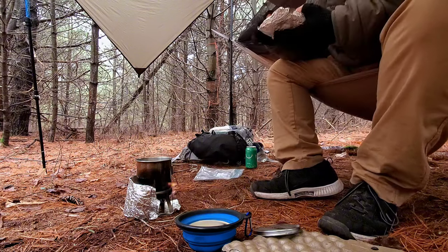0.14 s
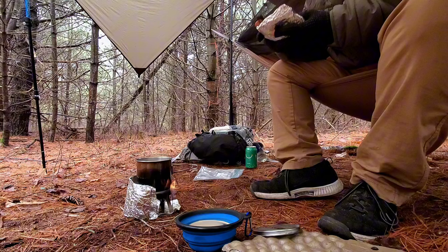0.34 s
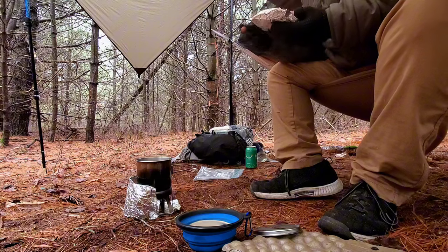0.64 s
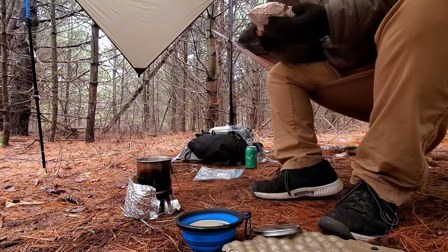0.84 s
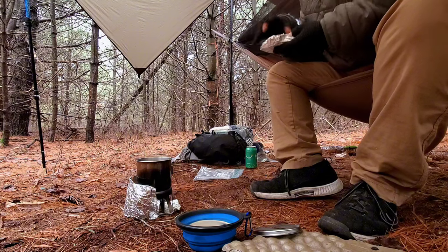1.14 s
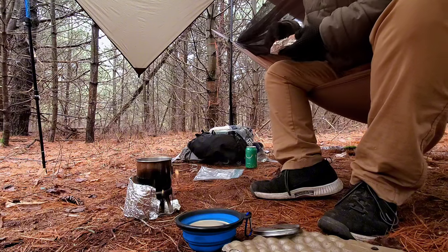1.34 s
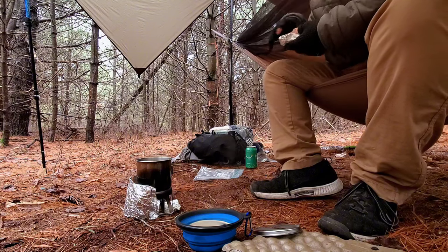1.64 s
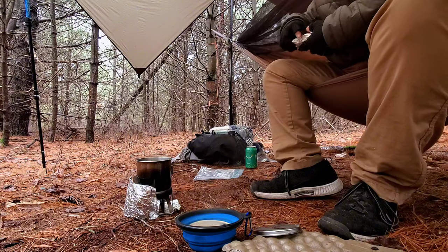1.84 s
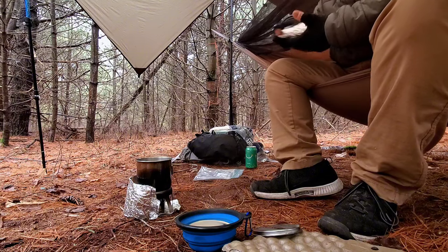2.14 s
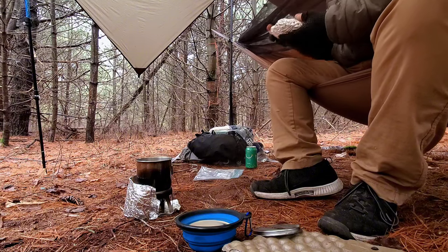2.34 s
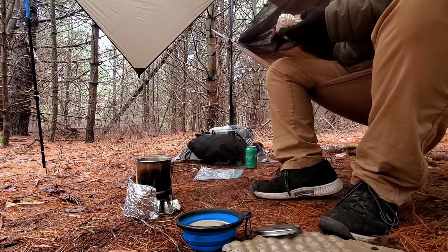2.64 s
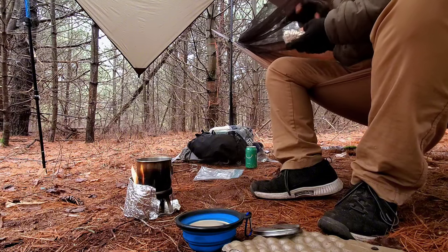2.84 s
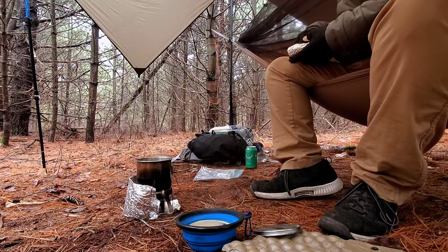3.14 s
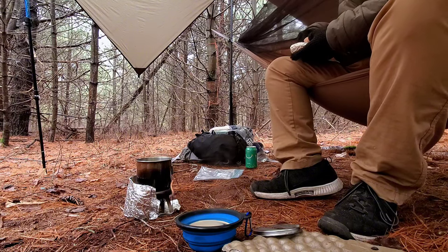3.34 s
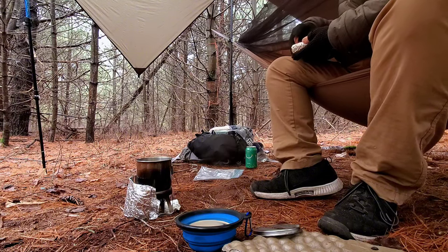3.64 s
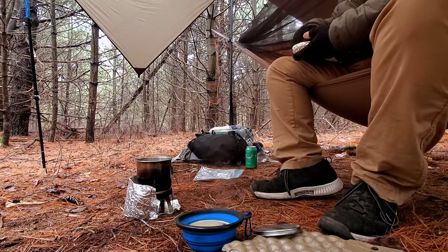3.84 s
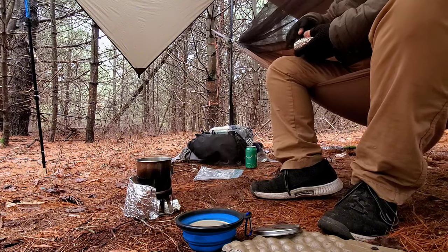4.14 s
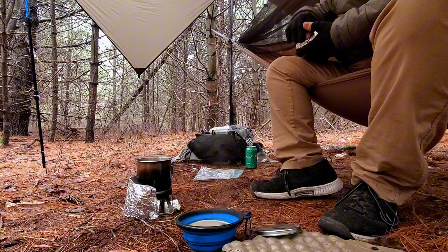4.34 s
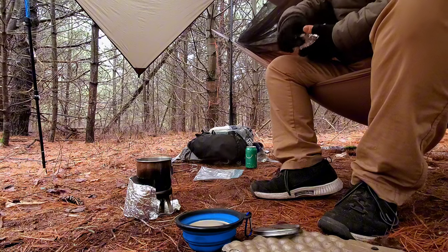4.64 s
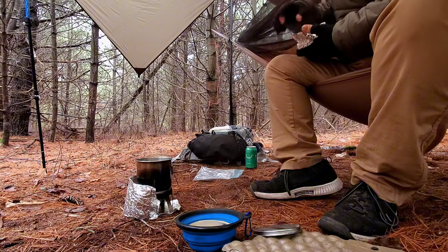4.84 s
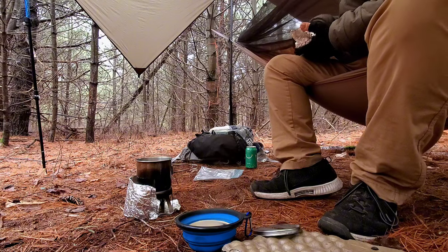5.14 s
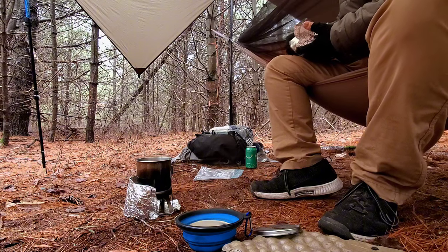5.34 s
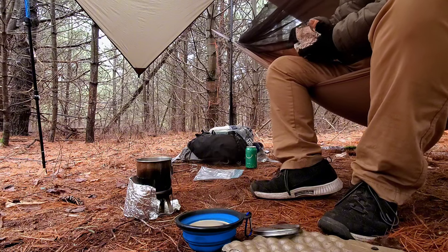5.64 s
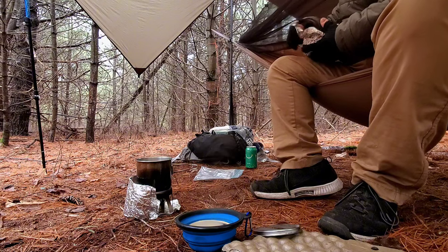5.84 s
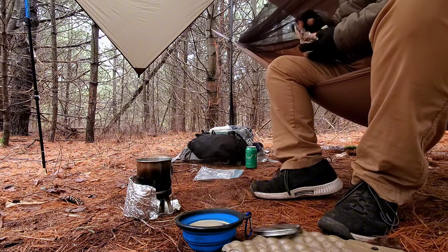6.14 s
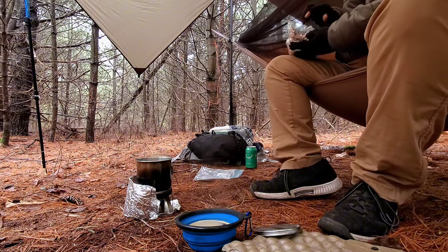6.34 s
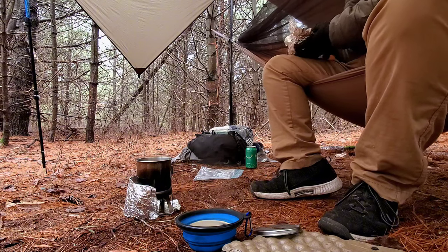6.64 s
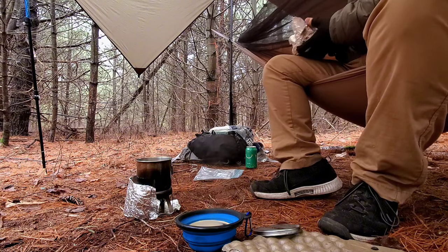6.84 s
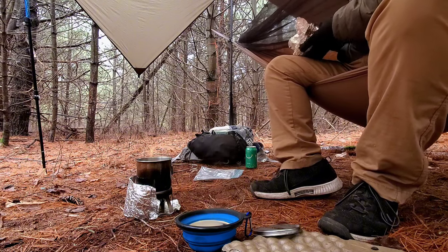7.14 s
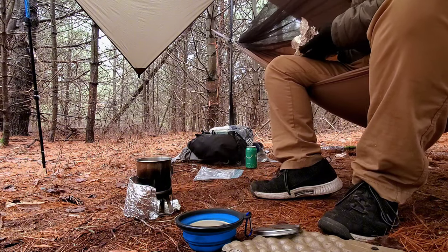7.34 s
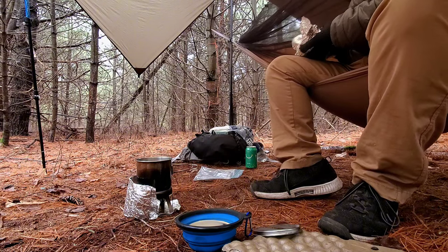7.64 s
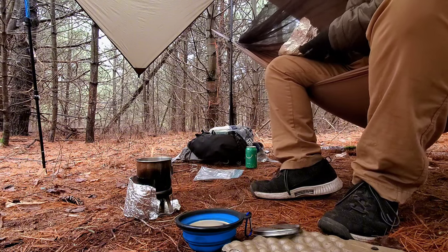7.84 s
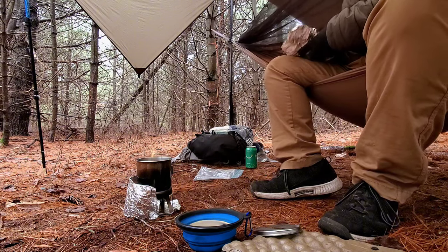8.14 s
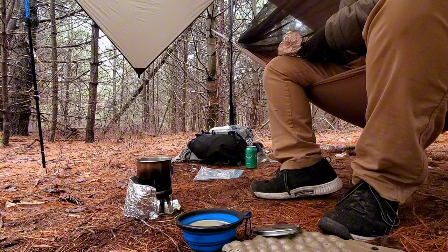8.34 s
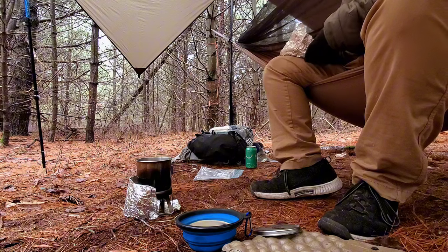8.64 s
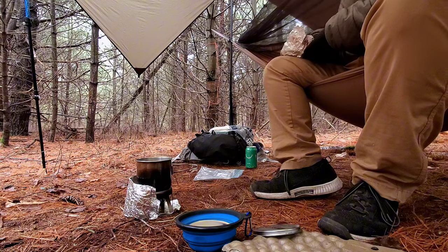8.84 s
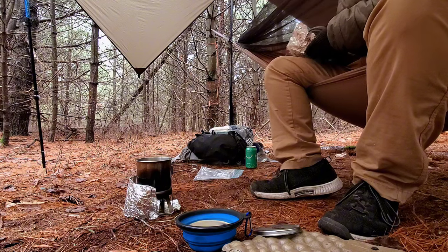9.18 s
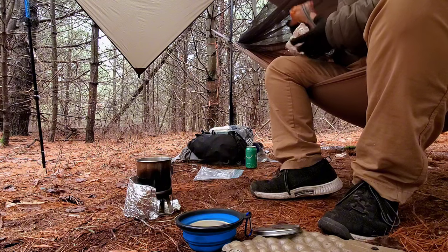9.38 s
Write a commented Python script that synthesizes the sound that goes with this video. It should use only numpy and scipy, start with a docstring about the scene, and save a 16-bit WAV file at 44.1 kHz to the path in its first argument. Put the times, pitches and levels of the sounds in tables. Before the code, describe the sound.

A plastic and foil food wrapper is turned and unwrapped by hand close to the microphone, slightly to the right, outdoors in a wood. Each movement makes a burst of fine, crisp rustling, dotted with sharp snaps as larger creases flip over. The crinkling comes in uneven spurts from the start to about 2.8 seconds, turns lighter until about 4.3, then picks up again. It is busiest from about 5 to 7.5 seconds, with louder crackles and several short, dull thuds as the packet is gripped. More bursts follow between 8 and 9 seconds, and a last crinkle and thud come at about 9.3. Underneath, a distant road gives a soft, steady low rumble, slightly from the left. From about 8.3 to 9.1 seconds a far engine adds a deep drone that wavers in level and climbs in pitch.

```python
"""A plastic and foil food wrapper is turned and unwrapped by hand, right of a small camera's two mic ports.
Each move of the hands sets off a rustle of tiny creases; bigger creases snap over and ring the sheet,
and the packet thuds dully as it is gripped. Behind it, beyond a tarp in a pine wood, a far road
rumbles from the left, and one engine drones up near the end."""
import sys
import numpy as np
from scipy import signal
from scipy.fft import rfft, irfft, next_fast_len
from scipy.io import wavfile
from scipy.ndimage import uniform_filter1d

SR = 44100
rng = np.random.default_rng(int(sys.argv[2]) if len(sys.argv) > 2 else 0)


def dump(signal):
    """Clip the signal to [-1, 1] and save it as 16-bit WAV at the path in sys.argv[1]."""
    limited = np.clip(np.atleast_2d(signal).T, -1, 1)
    pcm = np.round(limited * 32767).astype(np.int16)
    wavfile.write(sys.argv[1], SR, pcm)


N = 419391


def gain_of(db):
    """Decibels to amplitude."""
    return 10 ** (np.asarray(db) / 20)


def unit_rms(x):
    """Normalises to rms 1."""
    return x / np.sqrt(np.mean(x ** 2) + 1e-20)


def curve_at(points, hz):
    """Reads a breakpoint curve on a log-frequency axis."""
    f, value = np.transpose(points)
    return np.interp(np.log(hz + 1), np.log(f + 1), value)


def add(mix, start_s, sound):
    """Drops a sound into the mix at its cue."""
    part = mix[round(start_s * SR):][:len(sound)]
    part += sound[:len(part)]


def ticks(size, spiky_db):
    """Gritty noise on three buses: shared by both ports, left only, right only."""
    return unit_rms(rng.standard_normal((3, size)) * gain_of(spiky_db * rng.standard_normal(size)))


def mottle(shape, bins, frames):
    """Random texture of rms 1, smoothed over frequency bins and time frames."""
    across_pitch = uniform_filter1d(rng.standard_normal(shape[::-1]).T, bins, axis=0)
    return unit_rms(uniform_filter1d(across_pitch, frames, axis=-1))


# Tone of the road and air: f/Hz, relative level/dB
ROAD_EQ = [(20, -51), (35, -61), (50, 3), (70, 4), (100, -9), (160, -17.5), (280, -24.5), (450, -24),
           (700, -21), (1300, -28), (1800, -38.5), (2500, -48), (5000, -44), (7400, -48), (16000, -42)]
# Stereo image of the bed: f/Hz, left-right correlation
ROAD_COHERENCE = [(60, 1), (130, 0.86), (300, 0.82), (1000, 1), (1600, 0.47), (4000, 0.12)]
# Fader ride of the bed: t/s, level/dB
ROAD_FADER = [(0, -46), (3, -47), (4.5, -44.5), (6, -46), (9.51, -45)]


def far_road(mottle_db=-0.5, right_lag_ms=0.18):
    """A bed of far traffic and air among the trunks, reaching the left port first."""
    frames, hz = N // 512 + 5, np.fft.rfftfreq(2048, 1 / SR)
    noise = rng.standard_normal((frames, 1025, 4)).T
    left, diffuse = noise[0::2] + 1j * noise[1::2]
    coherence = np.clip(curve_at(ROAD_COHERENCE, hz), -1, 1)[:, None]
    delay = np.exp(-2j * np.pi * hz * right_lag_ms / 1000)[:, None]
    right = delay * coherence * left + np.sqrt(1 - coherence ** 2) * diffuse
    eq_db = curve_at(ROAD_EQ, hz)[:, None] + mottle_db * mottle(left.shape, bins=12, frames=8)
    bed = signal.istft(np.array([left, right]) * gain_of(eq_db), nperseg=2048, noverlap=1536)[1][:, :N]
    fader_db = np.interp(np.arange(N) / SR, *np.transpose(ROAD_FADER))
    return gain_of(fader_db) * unit_rms(bed)


# Bands of the big, middle, small and fine creases: centre f/Hz, width/Hz
CREASE_BANDS = np.array([(400, 500), (1700, 1400), (4600, 4000), (13000, 6000)])
# The wrapper's own tone: f/Hz, gain/dB
SHEET_EQ = [(70, 5), (160, 0.5), (700, -5.5), (1500, -1.5), (2400, -4), (2900, 0.5), (3600, -0.7),
            (5000, -2.43), (6600, -3), (7400, -9), (8300, -7.5), (10000, -4), (15500, 2.5)]


def sheet_colour(levels_db, hz):
    """Blends the levels of the four crease sizes into one EQ curve for the sheet, in dB."""
    crossfades = np.array([curve_at(np.c_[CREASE_BANDS[:, 0], solo], hz) for solo in np.eye(4)])
    density_db = np.transpose(levels_db) - 10 * np.log10(2 * CREASE_BANDS[:, 1] / SR)
    return (density_db @ crossfades + curve_at(SHEET_EQ, hz)).T


# Hand moves: peak t/s, build-up/s, let-go/s, level/dB, big-fold trim/dB, size tilt/dB (+ coarse, - fine)
HAND_MOVES = [(.02, .015, 0.074, -51.5, -15, -5), (.24, 0.099, 0.052, -42, -18, 0.5),
              (.66, 0.28, 0.019, -42.5, -15, 0), (.9, .17, .06, -45, -23, 2), (1.032, .06, .03, -45, -8, 0),
              (1.1, 0.019, 0.072, -61, -9, -1.5), (1.27, 0.032, 0.055, -57, -3, -3),
              (1.561, 0.24, 0.039, -46.5, -9, 0.5), (1.64, .02, .08, -62, -8, 0),
              (1.77, 0.043, 0.1, -51, -16, -2), (1.88, 0.059, 0.12, -56.5, -1, 3),
              (1.94, .03, 0.04, -60, -8, -8), (2.06, 0.024, 0.24, -56.5, -12, -3),
              (2.25, 0.071, 0.05, -42.5, -8, 0.5), (2.38, 0.066, 0.044, -44.5, -13, 1),
              (2.62, 0.18, 0.05, -42.5, -16, 1), (2.779, 0.043, 0.0081, -47.5, -6, 1),
              (2.82, .02, 0.083, -70, -8, 5), (3.018, 0.036, 0.18, -54.5, -1.5, -0.5),
              (3.2, 0.031, 0.033, -64, -8, -7), (3.39, .07, 0.069, -52.5, -5, 0),
              (3.63, 0.11, 0.045, -51.5, -7, 0), (3.7, .02, 0.045, -72, -11, 0),
              (3.87, 0.0067, 0.026, -57.5, -6, -4), (3.971, 0.035, 0.052, -48, -14, 0.5),
              (4.16, 0.17, 0.29, -54, -4.5, -1), (4.368, 0.09, 0.035, -44.5, -5.5, 2.5),
              (4.58, 0.12, 0.024, -45, -8, 1.5), (4.69, 0.081, 0.023, -44, -15, 0.5),
              (4.76, 0.055, 0.09, -48.5, -10, 0.5), (4.9, 0.09, 0.067, -52, -7, -1.5),
              (5.0, .03, .02, -60.5, -10, -1), (5.06, .015, 0.017, -55, -17, 3),
              (5.14, 0.036, 0.22, -48.5, -6, 1), (5.22, .03, 0.1, -74, 1, -1),
              (5.391, 0.054, 0.037, -40.5, -3.5, 2.5), (5.53, 0.044, .03, -49, 1, 2),
              (5.72, .04, 0.036, -53, 0, 1), (5.88, 0.094, 0.13, -46, -9.5, -0.5),
              (6.11, 0.091, 0.012, -40, -8.5, -0.5), (6.362, 0.23, 0.038, -45.5, -9, 0),
              (6.48, 0.082, 0.063, -53.5, -6.5, -2), (6.65, 0.11, 0.072, -52, -22, 0),
              (6.952, 0.35, 0.053, -40.5, -10.5, 0.5), (7.07, .03, 0.035, -62, -3, 0),
              (7.15, 0.046, 0.079, -54, -10, -0.5), (7.28, 0.043, 0.082, -47.5, -7.5, -0.5),
              (7.439, .12, 0.025, -45.5, 2.5, 1.5), (7.5, .02, .05, -64, -8, 0),
              (7.61, 0.027, .09, -65, -3, -5), (7.74, 0.015, 0.19, -54, 2, -0.5),
              (7.81, 0.027, 0.057, -47.5, -3.5, 2), (7.92, 0.069, 0.24, -50, -7, -1),
              (8.12, 0.023, .05, -54.5, 0, 2.5), (8.22, 0.031, 0.11, -46.5, -4.5, -1),
              (8.33, 0.023, 0.24, -41.5, -10, 0.5), (8.608, 0.17, 0.19, -47, -4, 0),
              (8.77, 0.019, 0.063, -60.5, 7.5, -2), (9.002, 0.17, 0.081, -50, -4.5, 0),
              (9.13, 0.035, 0.092, -58, 3, -2), (9.28, 0.051, .04, -43, 2, 2),
              (9.428, 0.018, 0.02, -54, -3, 1)]


def hand_moves(t, swell_db=6.5, attack_db_per_s=443, release_db_per_s=178, middle_db=-7, fine_db=-3):
    """Envelopes in dB for the four crease sizes: each move bites in, swells, eases and dies away."""
    peak_s, build, let_go, db, big_db, tilt_db = np.transpose(HAND_MOVES)[:, :, None]
    span = np.where(t < peak_s, build, let_go)
    skirt_db_per_s = np.where(t < peak_s, attack_db_per_s, release_db_per_s)
    away = abs(t - peak_s)
    move_db = db - swell_db * away / span - skirt_db_per_s * np.maximum(away - span, 0)
    trims_db = (big_db, middle_db + tilt_db, 0, fine_db - tilt_db)
    return [10 * np.log10(np.sum(gain_of(move_db + trim) ** 2, axis=0) + 1e-12) for trim in trims_db]


def rustle(layer_creases_per_s=270.0, spread_db=3.5, sizzle=1.0, mottle_db=1.5):
    """Three layers of tiny random creases over a dense sizzle, riding the moves of the hands."""
    power = np.full(N, sizzle ** 2)
    for t60 in (.008, .025, .07):  # tight creases die fast, loose ones ring on
        strength = gain_of(spread_db * np.minimum(rng.exponential(1, N), 5))
        hits = strength * (rng.random(N) < layer_creases_per_s / SR)
        decays = signal.lfilter([1], [1, -gain_of(-120 / t60 / SR)], hits ** 2)
        power += unit_rms(np.sqrt(decays)) ** 2 / 3
    hz, t, crackle = signal.stft(np.sqrt(power) * ticks(N, spiky_db=0.5), SR, nperseg=256, noverlap=128)
    broad = mottle(crackle.shape[1:], bins=9, frames=6)
    narrow = mottle(crackle.shape[1:], bins=2, frames=12)  # small flats of foil ring for a moment
    ringing_db = curve_at([(3500, 3.2), (6000, 1.8)], hz)[:, None] * narrow
    crackle *= gain_of(sheet_colour(hand_moves(t), hz) + mottle_db * broad + ringing_db)
    return signal.istft(crackle, SR, nperseg=256, noverlap=128)[1][:, :N]


# Creases snapping over: t/s, level/dB, length/s, ring f/Hz, size tilt/dB (+ coarse, - fine)
CREASE_SNAPS = [(0.146, -49, .008, 6400, -11), (0.216, -36, 0.0066, 4440, 3),
                (0.223, -37.5, .0047, 4040, -9), (0.285, -35, .0034, 5990, -2),
                (0.36, -43, 0.0073, 1530, 1), (0.374, -36, 0.0018, 5300, -8.5), (.438, -42, .015, 3060, 5),
                (0.495, -41, 0.0029, 3070, 13), (.509, -40, .0036, 2800, -4),
                (0.5356, -32.5, 0.0025, 4200, -1), (.553, -38, .006, 1100, 6), (.6325, -40, .005, 1530, -2),
                (0.6445, -43, 0.0058, 1560, 4), (0.6518, -40, 0.024, 2600, 6),
                (.741, -31.5, 0.0053, 5650, -3), (.807, -39.5, .0028, 2990, -1),
                (.837, -38, .0045, 4170, 0), (.858, -41, 0.0064, 1700, 5), (0.891, -39, 0.0041, 3070, 1),
                (.911, -40.5, .0026, 5250, -8), (.9684, -38, .003, 5360, -3),
                (1.0289, -38.5, 0.0074, 4310, -1), (1.22, -53, .003, 4800, -10),
                (1.261, -46.5, 0.019, 4800, -3.5), (1.355, -44.5, 0.045, 2580, 7),
                (1.438, -36, 0.0079, 3320, 6.5), (1.465, -44, .0023, 2110, -7),
                (1.475, -39, 0.0045, 4050, -4), (1.775, -39, 0.0099, 5130, 3), (1.8663, -38, .012, 5920, 4),
                (1.8824, -30.5, 0.0055, 5140, 1.5), (2.0393, -54, .002, 6500, -18),
                (2.092, -40.5, 0.00086, 4500, 1), (2.253, -35.5, 0.02, 3280, 0),
                (2.3842, -37, 0.0041, 2880, 7), (2.3918, -30, 0.0034, 2750, 7.5),
                (2.47, -44, .0058, 5240, -4), (2.527, -41, 0.0019, 6930, -12),
                (2.538, -40, .0058, 5730, -4), (2.566, -35.5, .0021, 3730, 12),
                (2.593, -36, 0.0024, 3770, 4), (2.629, -36.5, .017, 2850, 7.5),
                (2.6838, -41.5, 0.0037, 6090, -5), (2.7666, -37, 0.01, 3080, 3.5),
                (3.379, -45.5, 0.018, 5740, -2), (3.434, -48, 0.021, 4140, -4),
                (3.581, -43, 0.017, 3950, 4), (3.6167, -42, .01, 5300, 3),
                (3.6635, -42.5, 0.0074, 5200, -1), (4.482, -37.5, 0.014, 1290, 2),
                (4.513, -43, 0.002, 3270, -1), (4.5485, -33.5, 0.019, 5800, 6),
                (4.568, -31, .0024, 3660, 1), (4.685, -35, .0016, 5700, -5),
                (4.694, -31.5, .0018, 6800, -7), (5.051, -42.5, .0039, 6200, -4),
                (5.059, -39.5, 0.0016, 3790, -3), (5.0958, -47, 0.0017, 6500, -9),
                (5.119, -33, 0.014, 4700, 1), (5.2064, -44, 0.0054, 6750, -8),
                (5.32, -41, 0.0036, 5120, -4), (5.345, -32, 0.0023, 1890, 5.5),
                (5.3683, -33, 0.0079, 5000, 0), (5.42, -30, 0.0058, 4180, 2), (5.528, -39, .0076, 3200, 2),
                (5.5627, -45, 0.0074, 2950, 8), (5.699, -44.5, 0.015, 1900, 8),
                (5.82, -47, .006, 3850, -12), (5.842, -39.5, .02, 1820, 1), (5.947, -32, 0.00083, 3900, 5),
                (6.0862, -35, 0.006, 5560, 8), (6.104, -30, 0.0076, 1840, 3.5),
                (6.212, -42.5, .0029, 3230, -11), (6.2592, -39.5, 0.04, 3130, -2),
                (6.349, -38, 0.0044, 2730, 5), (6.365, -36, .012, 2690, 3),
                (6.551, -37.5, 0.011, 3040, -2.5), (6.599, -36, 0.0025, 1010, -2),
                (6.6463, -38, 0.0024, 3500, 4), (6.6943, -33.5, 0.0024, 2860, 0),
                (6.769, -35, .01, 1800, 2), (6.816, -35.5, 0.0079, 5500, 3),
                (6.833, -28.5, 0.0026, 3500, -2.5), (6.867, -37, 0.0025, 3040, -2),
                (6.924, -29.5, .0138, 5200, -5), (6.961, -29.5, .014, 1300, -1),
                (7.153, -41.5, 0.0026, 4180, -1), (7.3505, -37.5, 0.015, 4660, 8),
                (7.375, -39.5, 0.0079, 1980, -1), (7.417, -36, 0.015, 4600, 1),
                (7.723, -47.5, 0.013, 3160, -4), (7.8047, -46, .01, 5040, -8),
                (7.896, -43.5, 0.005, 3250, -6), (7.94, -44, 0.013, 5860, -1),
                (8.209, -33, 0.0018, 4300, 4.5), (8.24, -38, .0022, 4970, 3),
                (8.3188, -36.5, 0.0014, 6950, -16), (8.3472, -39, 0.035, 3300, -4),
                (8.384, -33.5, 0.015, 3270, 0), (8.407, -37.5, 0.0032, 5810, 7),
                (8.442, -38, 0.022, 6340, 0.5), (8.609, -41, .008, 4900, -3),
                (8.8146, -42.5, 0.0076, 3420, -2), (8.8317, -39.5, .0025, 3830, -4),
                (8.955, -44, 0.0025, 3550, -3), (9.0094, -38.5, .004, 3520, 5),
                (9.1152, -46.5, 0.0092, 1720, 0.5), (9.2424, -46, .002, 6500, -8),
                (9.27, -37, .015, 3020, 5)]


def snaps(ripple_db=1.5, ring_db=8.0, half_width_hz=202.0, big_db=-14.0, middle_db=-7.5, fine_db=-3.5):
    """Spot creases: a run of ticks rings the patch of sheet around it and leaves a faint tail."""
    out, t, hz = np.zeros((N, 3)), np.arange(2048) / SR, np.fft.rfftfreq(2048, 1 / SR)
    for start_s, db, length, ring_hz, tilt_db in CREASE_SNAPS:
        ripple = mottle((len(hz), 1), bins=30, frames=1)[:, 0]
        resonance_db = ring_db / (1 + ((hz - ring_hz) / half_width_hz) ** 2)
        sheet_db = sheet_colour([big_db, middle_db + tilt_db, 0, fine_db - tilt_db], hz)
        eq_db = sheet_db + ripple_db * ripple + resonance_db
        ring = irfft(rfft(ticks(2048, spiky_db=2.0)) * gain_of(eq_db))
        attack = 1 - np.exp(-t / (.07 * length))  # long runs build up more slowly
        body = np.exp(-(t / length) ** 1.7)
        tail = gain_of(-11 - 60 * t / .09)
        add(out, start_s, (ring * attack * (body + tail) * gain_of(db)).T)
    return out.T


# Grips and folds of the packet: t/s, level/dB, f/Hz
PACKET_THUDS = [(1.489, -40, 179), (1.879, -32, 188), (2.245, -37, 177), (2.39, -35, 401),
                (4.551, -32.5, 205), (5.118, -40, 188), (5.341, -29, 210), (5.384, -27, 406),
                (5.417, -21.5, 298), (5.562, -32.5, 415), (6.055, -33, 423), (6.082, -38, 174),
                (6.764, -31, 182), (6.834, -30.5, 225), (6.959, -36, 358), (7.263, -33, 244),
                (7.348, -24.5, 398), (7.421, -31, 212), (7.724, -37, 186), (8.126, -34.5, 191),
                (8.195, -33, 390), (8.65, -37, 180), (9.222, -38, 182), (9.267, -24, 177)]


def thuds(attack_s=0.0016, t60_s=0.04, overtone_ratio=1.7):
    """The gripped packet gives a short hollow ring with one overtone, on the shared bus."""
    out, t = np.zeros((3, N)), np.arange(4096) / SR
    attack = 1 - np.exp(-t / attack_s)
    for start_s, db, hz in PACKET_THUDS:
        phase = rng.random(2)
        fundamental = np.sin(2 * np.pi * (hz * t + phase[0]))
        overtone = 0.39 * np.sin(2 * np.pi * (overtone_ratio * hz * t + phase[1]))
        add(out[0], start_s, (fundamental + overtone) * attack * gain_of(db - 60 * t / t60_s))
    return out


# Pitch and fader ride of the engine: t/s, f/Hz, level/dB
ENGINE_DRONE = [(8.28, 48.2, -54), (8.392, 47.6, -39), (8.456, 49.2, -43), (8.656, 54.5, -39),
                (8.75, 53.5, -46), (8.804, 58.4, -60), (8.854, 58.4, -33), (9.058, 58.3, -38),
                (9.102, 59.4, -59), (9.12, 58.9, -49)]


def engine():
    """The low firing tone of a far engine, climbing in pitch as its level surges and dips."""
    times, hz, db = np.transpose(ENGINE_DRONE)
    t, out = np.arange(times[0], times[-1], 1 / SR), np.zeros(N)
    tone = np.sqrt(2) * np.sin(2 * np.pi * np.cumsum(np.interp(t, times, hz)) / SR)
    add(out, times[0], tone * gain_of(np.interp(t, times, db)) * signal.windows.tukey(len(t), .15))
    return out


# How much later the left port hears the hands: t/s, delay/ms
LEFT_LAG = [(0, 0.085), (1, 0.069), (2, 0.16), (4, 0.18), (6, .16), (9.5, .17)]
# Scattered sound against the shared bus: f/Hz, relative level/dB
SCATTER_BALANCE = [(200, -15), (700, -8), (1600, -3), (3000, 0), (6000, 7), (9000, 5.5), (14000, 9)]


def place_right(buses):
    """Three buses to stereo: shared sound lags on the left; short waves scatter differently to each port."""
    hz, t, spectra = signal.stft(buses, SR, nperseg=256, noverlap=128)
    shared, scattered = spectra[0], spectra[1:]
    delay = np.exp(-2j * np.pi * hz[:, None] * np.interp(t, *np.transpose(LEFT_LAG)) / 1000)
    width = gain_of(curve_at(SCATTER_BALANCE, hz))[:, None]
    ports = (np.array([delay * shared, shared]) + width * scattered) / np.sqrt(1 + width ** 2)
    return signal.istft(ports, SR, nperseg=256, noverlap=128)[1][:, :N]


def scene():
    """The wrapper close on the right, over the road bed and the centred engine."""
    return place_right(snaps() + rustle() + thuds()) + far_road() + engine()


# Treble lean of the two mic ports: f/Hz, left minus right/dB
PORT_BALANCE = [(200, 0), (2800, -1), (6000, -0.5), (8500, 7.5), (12000, 0), (16000, 0.5)]


def record(dry, low_cut_hz=36, high_cut_hz=15850):
    """Each port colours the treble its own way; the deepest bass and the very top roll off."""
    size = next_fast_len(N)
    hz = np.fft.rfftfreq(size, 1 / SR)
    lean_db = curve_at(PORT_BALANCE, hz) * np.array([[.5], [-.5]])
    low_cut = 1 / np.sqrt(1 + (low_cut_hz / (hz + 1)) ** 8)
    ported = irfft(rfft(dry, size) * gain_of(lean_db) * low_cut, size)[:, :N]
    high_cut = signal.firwin(511, high_cut_hz, window=("kaiser", 9), fs=SR)
    return signal.oaconvolve(ported, high_cut[None], "same")


dry = scene()
out = record(dry)
dump(out)
```